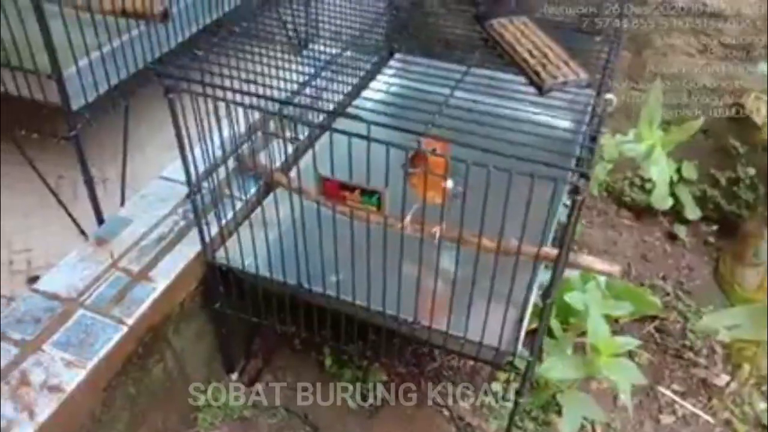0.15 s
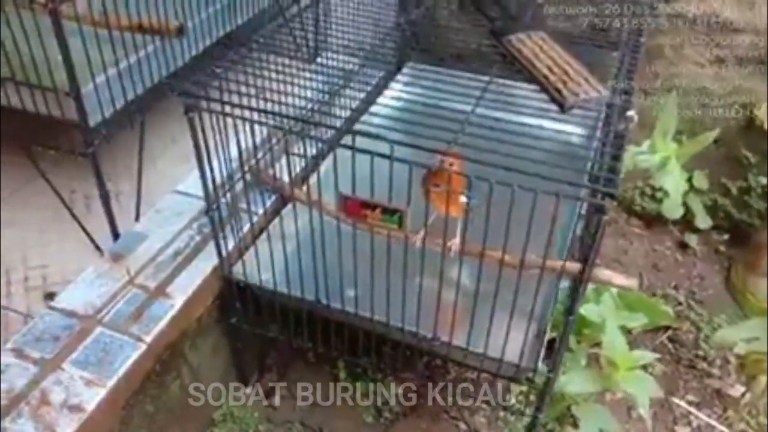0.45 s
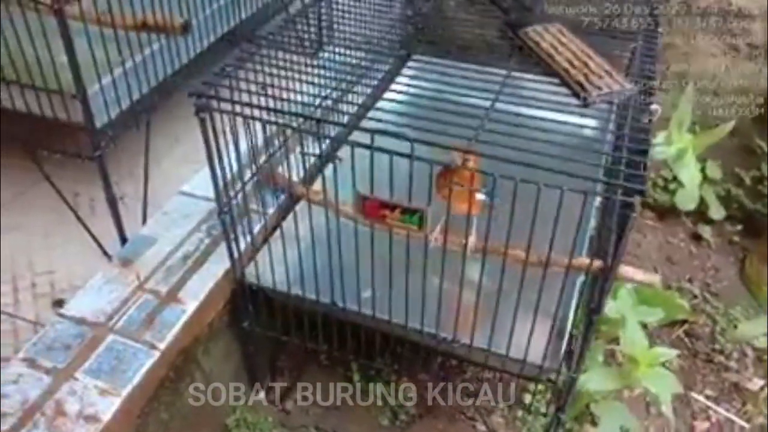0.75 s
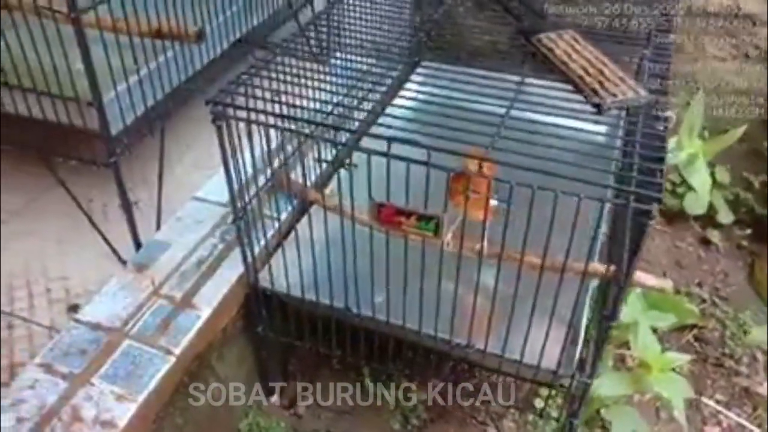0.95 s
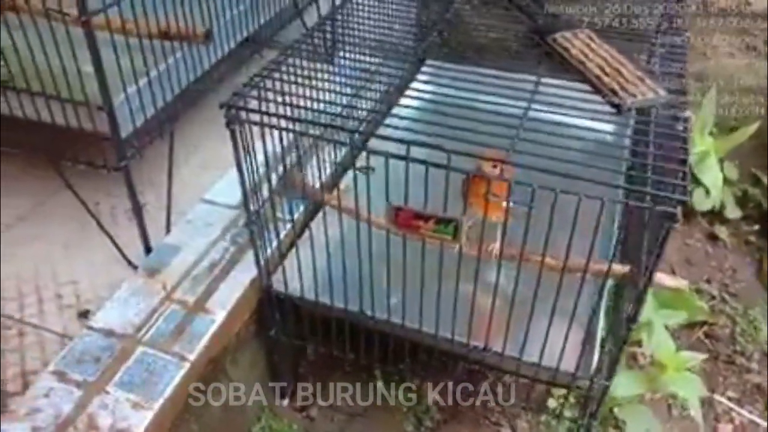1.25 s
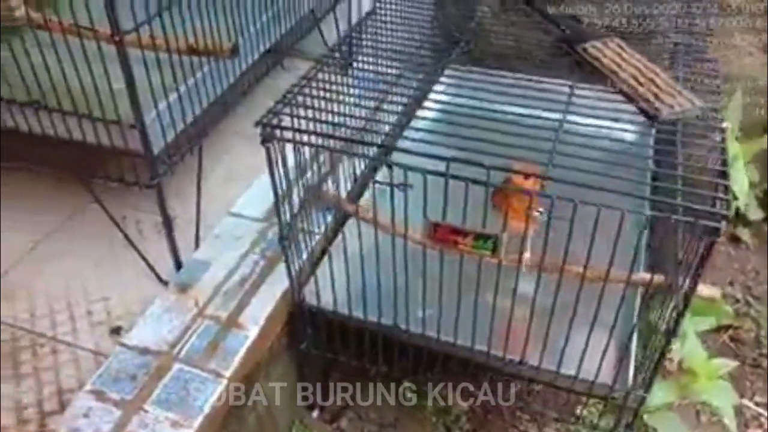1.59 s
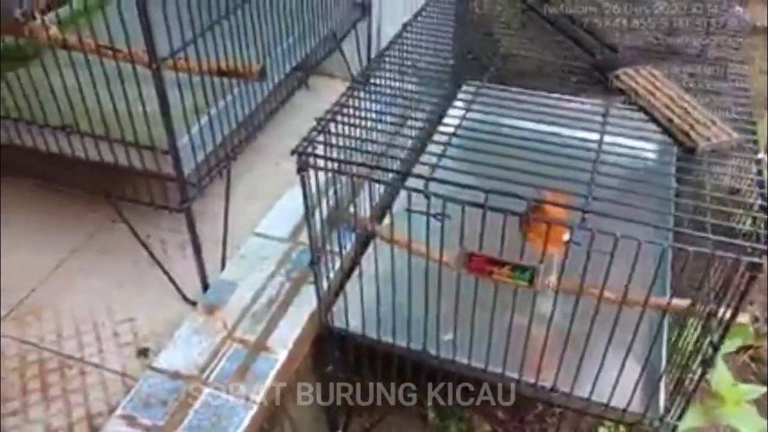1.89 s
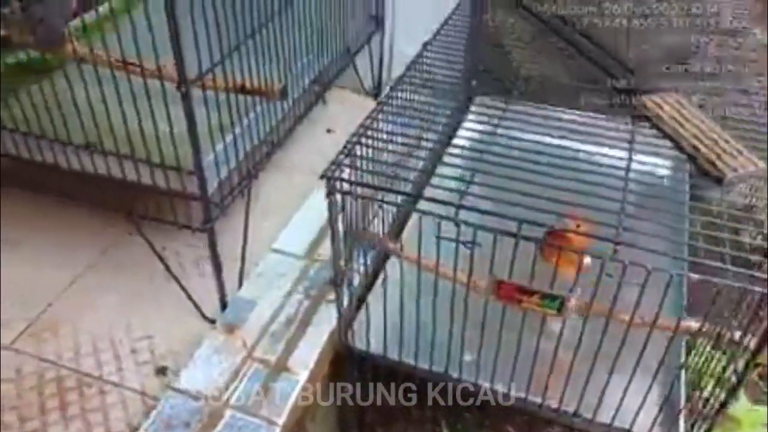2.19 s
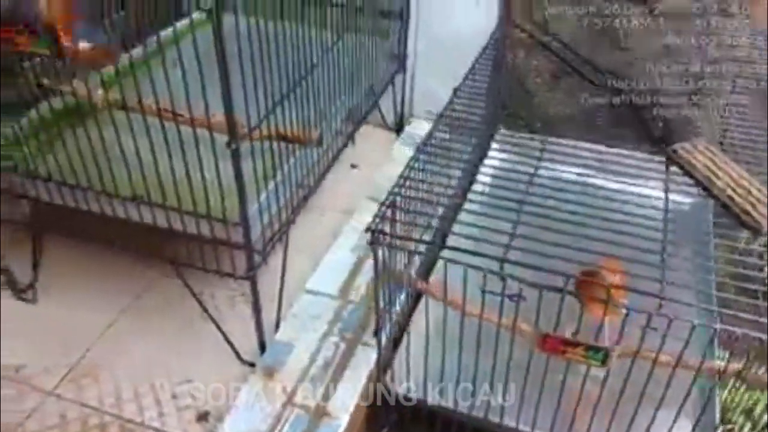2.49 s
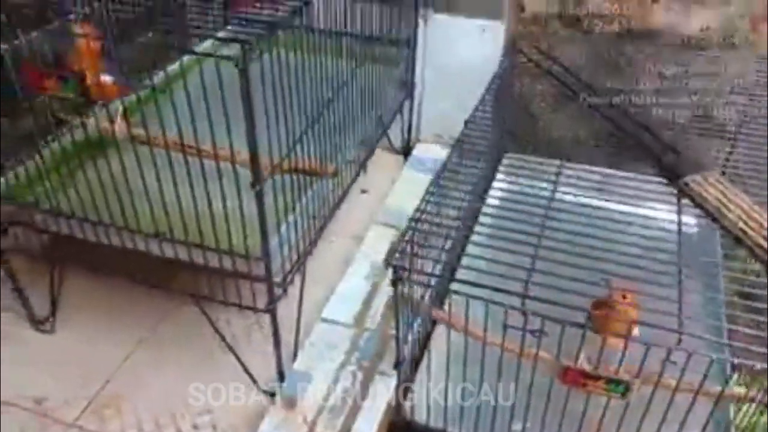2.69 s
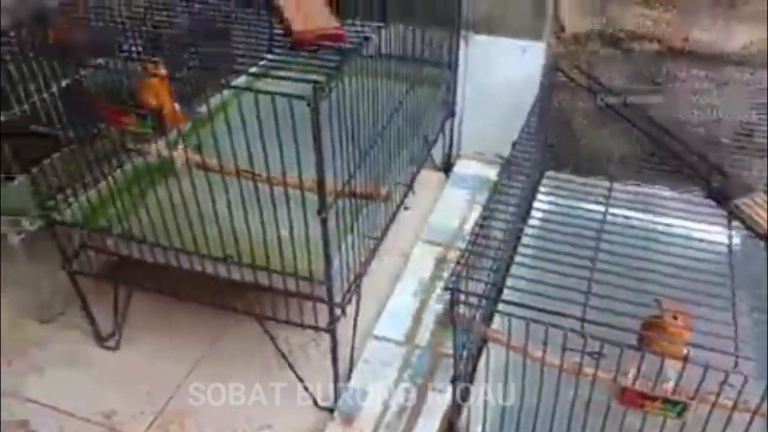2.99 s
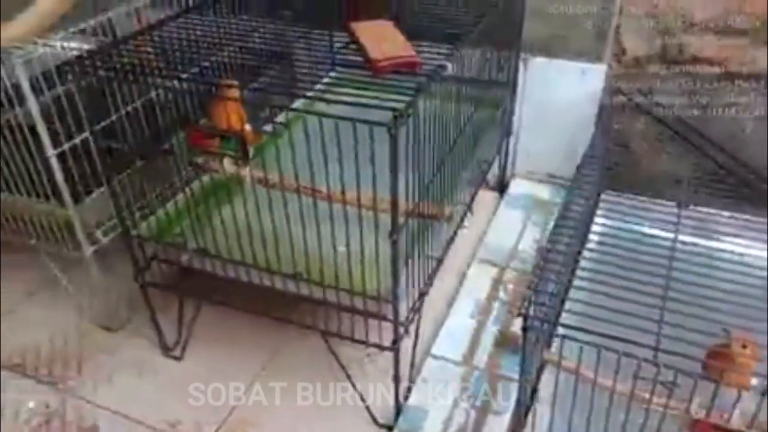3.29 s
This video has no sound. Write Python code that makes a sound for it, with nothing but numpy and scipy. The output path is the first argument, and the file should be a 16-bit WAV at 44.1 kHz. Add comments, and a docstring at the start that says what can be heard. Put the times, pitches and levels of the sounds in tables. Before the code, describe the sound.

Quick high bird chirps and a falling whistle, answered by farther wavering birds in an echoing yard.

```python
"""Caged birds in a tiled yard

A caged thrush close by sings hoarse two-voiced chirps and a falling whistle: paired sines, their
sum tones and sidebands, and rasping noise. Farther caged birds whistle as single wavering voices.
Shaped noise and unsteady drones make the distant traffic; sparse decaying echoes from the walls
smear every note."""
import sys
import numpy as np
from scipy import signal
from scipy.fft import rfft, irfft
from scipy.io import wavfile
from scipy.ndimage import uniform_filter1d

SR = 44100
rng = np.random.default_rng(int(sys.argv[2]) if len(sys.argv) > 2 else 0)


def master_out(mix):
    """Clip the mix to full scale and print it as 16-bit PCM to the path in sys.argv[1]."""
    frames = np.transpose(np.atleast_2d(mix))
    ceiling = np.clip(frames, -1, 1)
    pcm = np.round(ceiling * 32767).astype(np.int16)
    wavfile.write(sys.argv[1], SR, pcm)


def invert_db(level):
    """Linear amplitude ratio for a level in decibels (20 dB per decade), elementwise."""
    return 10 ** (np.asarray(level, dtype=float) / 20)


N = 152145  # samples

# Traffic and air spectrum, relative: frequency_hz, density_db (per Hz)
FLOOR_SPECTRUM = [(12, -36), (20, -10.5), (65, 1), (232, -9), (592, -18), (973, -30), (2050, -38.5),
                  (2770, -40), (4070, -47.5), (5830, -46), (7680, -52), (13300, -43), (14500, -66.5)]
# Left-right likeness of the background: frequency_hz, correlation (-1 to 1)
STEREO_LIKENESS = [(60, 0.97), (180, 0.95), (530, 0.82), (1580, 0.46), (4710, -0.14), (14000, -0.11)]
# The background sinks and returns: time_s, level_db
SWELL = [(0, 2.5), (.25, -0.5), (.5, -3.5), (1.1, -7.5), (1.45, -3.5), (1.85, 2), (2.4, 1.5), (2.7, 3),
         (3.45, 2.5)]
# How far each band follows the swell: frequency_hz, share (ratio)
SWELL_SHARE = [(40, 0.25), (120, 0.24), (300, 0.95), (1000, 1.02), (5000, 0.79)]
# Engine drones; width sets the rate of sway: pitch_hz, width_hz, level_db (before sway and swell)
DRONES = [(58, 4.7, -52), (101.5, 48, -59.5), (217, 9, -60), (252.8, 11.5, -64), (330.5, 6.7, -65.5)]
# Near bird, one table per note: time_s, main_hz, main_db, second_hz, second_db, rasp_db,
# overtone_db (over the main voice); levels before beak colour and shimmer
CHIRPS = [
    [(.152, 4190, -58, 2002, -50.5, -59.5, -35.5), (.168, 5025, -34, 2750, -46.5, -40.5, -16.5),
     (.2, 4548, -39, 2637, -45, -36, -5), (.23, 4230, -45.5, 2600, -83.5, -69.5, 4.5),
     (.258, 4327, -48, 2500, -58, -37, 1), (.28, 4610, -40.5, 2870, -52.5, -46.5, -8),
     (.3, 4980, -43.5, 3250, -46, -36.5, -8), (.335, 4680, -39, 3540, -47, -48.5, -16),
     (.352, 4680, -74, 3780, -88, -88, -13)],
    [(.394, 5100, -57.5, 3220, -63, -55.5, -24.5), (.406, 5330, -43, 3650, -60.5, -38.5, -14.5),
     (.424, 5077, -34.5, 3790, -47.5, -40, -14), (.446, 4830, -43.5, 3840, -61, -56.5, -6.5),
     (.472, 4460, -44, 3750, -78, -80, -5)],
    [(.534, 4810, -68, 2460, -54, -43.5, -17), (.545, 5400, -35, 3300, -53.5, -41.5, -13),
     (.558, 5445, -32.5, 4050, -60, -42, -6), (.58, 5500, -34, 4120, -52, -47, -17),
     (.59, 5490, -53, 4150, -80.5, -57, -22)],
    [(.61, 5210, -58, 3950, -57, -60.5, 16), (.62, 5490, -30.5, 4100, -74, -75, -9),
     (.633, 5190, -61, 4160, -60.5, -36, -9.5)],
    [(.661, 5106, -50, 3780, -68.5, -59, -3.5), (.67, 5170, -47, 3955, -53, -48, 4),
     (.686, 5400, -37.5, 3850, -63, -49.5, -5), (.72, 5290, -51, 3860, -75.5, -50.5, -0.5),
     (.762, 5290, -69, 3900, -91, -65, -17), (.775, 5330, -70, 3850, -85, -76.5, -9)],
    [(.885, 4394, -40, 2897, -33, -49, -13.5), (.893, 5070, -41, 3010, -66, -42.5, -12),
     (.901, 5794, -35, 4167, -47.5, -53, -6), (.918, 5820, -40, 4130, -72, -46.5, -14.5),
     (.96, 5656, -40.5, 4250, -120, -82.5, -5.5), (1.04, 5720, -42, 4100, -95, -105.5, -4.5),
     (1.07, 5573, -42, 4100, -90, -96.5, -5.5), (1.082, 5460, -73, 4100, -98, -70.5, 3)],
    [(1.32, 3700, -51, 5300, -61, -58, -18.5), (1.333, 3450, -54, 5000, -69.5, -50, -30),
     (1.35, 3250, -51.5, 4400, -58, -48, -54), (1.365, 3050, -47.5, 1500, -58, -64, -36),
     (1.385, 2890, -48, 1450, -84, -63, -44), (1.43, 2600, -46.5, 1330, -81, -69, -30.5),
     (1.48, 2507, -44.5, 1316, -78, -75.5, -34.5), (1.6, 2593, -48.5, 1310, -72, -68, -30.5),
     (1.66, 2612, -45.5, 1330, -72.5, -69, -32), (1.705, 2450, -50, 1310, -75, -66, -31),
     (1.72, 2360, -58, 1237, -69, -67, -28)],
]
# Per chirp: pan_db (left over right), jitter (share of pitch), sideband_db (over the rasp)
CHIRP_SETTINGS = [(1.5, .014, -1.5), (0.5, 0.014, -2), (-1, .008, -1), (2, 0.011, 3.5), (0, .01, -3),
                  (0.5, 0.0123, -3.5), (1.5, 0.0183, -10)]
# Farther birds, one table per whistle: time_s, pitch_hz, level_db (before beak, shimmer and distance)
WHISTLES = [
    [(.83, 2380, -71.5), (.9, 2494, -64.5), (.96, 2630, -78), (1.02, 2720, -73)],
    [(1.04, 2300, -69.5), (1.1, 2430, -67.5), (1.13, 2537, -64.5), (1.2, 2590, -83)],
    [(1.2, 2300, -69.5), (1.25, 2037, -71), (1.3, 2104, -61), (1.34, 1800, -59.5), (1.38, 1570, -71)],
    [(1.41, 2165, -58), (1.5, 2053, -66.5), (1.6, 1975, -58), (1.72, 2126, -60)],
    [(1.42, 1584, -74), (1.55, 1490, -77), (1.72, 1613, -67)],
    [(1.83, 2120, -61), (1.87, 2300, -68.5), (1.89, 2680, -63), (1.96, 2565, -68)],
    [(1.968, 3250, -63), (2.0, 3020, -64.5), (2.06, 3050, -59)],
    [(2.0, 2842, -56), (2.05, 2904, -57), (2.11, 2704, -55.5), (2.17, 2807, -52), (2.23, 2970, -54),
     (2.26, 2930, -69)],
    [(2.318, 3890, -63), (2.36, 3930, -57.5), (2.43, 3900, -75)],
    [(2.31, 5140, -78), (2.42, 4750, -74), (2.46, 4600, -72.5), (2.52, 4940, -76)],
    [(2.455, 3050, -60), (2.48, 3480, -67), (2.52, 3000, -60)],
    [(2.525, 2818, -50.5), (2.57, 2692, -63), (2.615, 2704, -53)],
    [(2.535, 5180, -66.5), (2.57, 5810, -66.5), (2.61, 6430, -81), (2.67, 5640, -72)],
    [(2.63, 2739, -51.5), (2.66, 2863, -52.5), (2.7, 2790, -77)],
    [(2.885, 2170, -71.5), (2.95, 2075, -62), (2.99, 1970, -57.5)],
    [(3.01, 2320, -59), (3.04, 2450, -61.5), (3.075, 2850, -55), (3.1, 3020, -56), (3.125, 3200, -67)],
    [(3.235, 2240, -60), (3.265, 2230, -59), (3.29, 2007, -65.5), (3.33, 1954, -64.5), (3.4, 1970, -75)],
]
# Per whistle: pan_db (left over right), jitter (share of pitch), overtone_db, breath_db (over the voice)
WHISTLE_SETTINGS = [(-2, .008, -34, -26), (-1.5, 0.025, -50, -30), (1.5, 0.019, -38, -15),
                    (0, 0.038, -35, -44), (-3.5, 0.0586, -28, -37), (1.5, 0.026, -24.5, -16),
                    (4, 0.062, -33, -17.5), (-1, 0.01, -35, -28), (-2, 0.021, -20, -15), (1, 0.083, -26, 3),
                    (3, 0.063, -40, -19), (3.5, 0.019, -29, -17), (0, .07, -22, -11),
                    (0.5, 0.011, -37, -14), (-1.5, 0.014, -42, -28), (1, 0.034, -25, -23),
                    (-0.5, 0.017, -35.5, -29)]
# Harmonics of a voice: multiple (ratio), level_db (added to the note's overtone level)
OVERTONES = [(2, -6), (3, -7), (4, 2.5), (5, -3)]
# Colour of the open beak and the microphone: frequency_hz, gain_db
BEAK = [(1000, 10.5), (1900, -2), (2700, 1), (5000, -1.5), (6500, -1), (7600, -4.5), (8800, 2.5),
        (11000, 2.5), (13000, 14), (14500, -1)]
# Relative spectrum of the rasping air and weight of the sidebands: frequency_hz, gain_db
RASP_SPECTRUM = [(1200, -27.5), (1900, -30.5), (3000, -8), (4000, -7.5), (5200, -3.5), (7300, -13.5),
                 (8500, -9.5), (10000, -6.5), (12500, -5), (14500, -3)]
# Sideband places around the main voice, negative steps on the second voice's side:
# step (multiples of the gap between the voices)
SIDEBAND_STEPS = [-3, -2, 1, 2, 3, 4, 5, 6, 7]
# Time for the yard's echoes to die by 60 dB: frequency_hz, t60_s
YARD_T60 = [(1500, 0.49), (3000, .6), (5500, 0.39), (9000, 0.43), (13000, 0.27)]

FLOOR_DB, AIR_TOP_HZ = -43.5, 13730  # level before overlap scaling; spectrum is flat above the top
EDGE_S = .008  # fade at each end of a note
JITTER_S, SHIMMER_DB = .0015, 2
SUM_DB, LOW_DOUBLE_DB = 33, -2  # sum tones; octave of the second voice
GAP_TONE_DB, GAP_LOW_HZ = -20, 1697  # the gap itself sounds when it is high enough
NEAR_WET_DB, FAR_WET_DB, FAR_DRY_DB = 2, 4.5, -2
FIRST_ECHO_S, SHARED_ECHO = .001, 0.073  # earliest echo; share of echo power common to both sides
CAGE_DB, CAGE_T60_S = 2, .09  # quick echoes from the tray and the nearest wall


def evened(x):
    """Normalization: scales a signal to unit rms."""
    return x / np.sqrt(np.mean(x ** 2) + 1e-20)


def read(points, hz):
    """Spectral interpolation: reads a curve along a logarithmic frequency axis."""
    f, value = np.transpose(points)
    return np.interp(np.log(hz + 1), np.log(f + 1), value)


def wobble(n, seconds):
    """Low-pass random modulation: noise averaged twice wanders smoothly at unit rms."""
    size = max(int(seconds * SR), 2)
    smooth = uniform_filter1d(rng.standard_normal(n), size)
    return evened(uniform_filter1d(smooth, size))


def background():
    """Partly coherent noise: traffic rumble and air hiss, with narrow-band engine drones wavering."""
    frames, hz = N // 512 + 5, np.fft.rfftfreq(2048, 1 / SR)
    a, b, c, d, patches = rng.standard_normal((frames, 1025, 5)).T
    patches = uniform_filter1d(patches, 10, 0)
    patches = evened(uniform_filter1d(patches, 10, 1))

    # the right side blends the left's noise with its own
    same = read(STEREO_LIKENESS, hz)[:, None]
    left = a + 1j * b
    right = same * left + np.sqrt(1 - same ** 2) * (c + 1j * d)
    z = np.array([left, right])
    z *= invert_db(read(FLOOR_SPECTRUM, np.minimum(hz, AIR_TOP_HZ))[:, None] + 1.5 * patches)
    z /= np.sqrt(np.mean(abs(z) ** 2))
    swell_db = np.interp(np.arange(frames) * 512 / SR, *np.transpose(SWELL))
    z *= invert_db(read(SWELL_SHARE, hz)[:, None] * swell_db)
    noise = signal.istft(z, nperseg=2048, noverlap=1536)[1][:, :N]
    out = invert_db(FLOOR_DB) * 1.23 * np.sqrt(3) / 64 * noise

    t = np.arange(N) / SR
    swell_db = np.interp(t, *np.transpose(SWELL))
    for pitch_hz, width_hz, level_db in DRONES:
        # a wandering complex envelope sways both level and phase
        sway = wobble(N, 0.86 / width_hz) + 1j * wobble(N, 0.58 / width_hz)
        tone = ((1 + sway / 2) * np.exp(2j * np.pi * pitch_hz * t)).real
        out += invert_db(level_db + read(SWELL_SHARE, pitch_hz) * swell_db) * tone
    return out


def controls(rows):
    """Piecewise-linear control: note columns at every sample, with a gate that fades at both ends."""
    rows = np.array(rows)
    t = np.arange(rows[0, 0], rows[-1, 0], 1 / SR)
    gate = np.clip(np.minimum(t - t[0], t[-1] - t) / EDGE_S, 0, 1)
    return gate, [np.interp(t, rows[:, 0], column) for column in rows.T[1:]]


def jittered_phase(hz, jitter):
    """Frequency modulation: phase is the running integral of an unsteady pitch."""
    return 2 * np.pi * np.cumsum(hz * (1 + jitter * wobble(len(hz), JITTER_S))) / SR


def partial(phase, hz, db):
    """Source and filter: one sine coloured by the beak, silent above the top of the band."""
    return np.sqrt(2) * invert_db(db + read(BEAK, hz)) * (hz < .45 * SR) * np.sin(phase)


def stack(phase, hz, db, overtone_db):
    """Harmonic series: a voice with phase-locked overtones at whole multiples."""
    voice = partial(phase, hz, db)
    for multiple, level_db in OVERTONES:
        k = round(multiple)
        voice = voice + partial(k * phase, k * hz, db + overtone_db + level_db)
    return voice


def chirp(rows, jitter, sideband_db, rasp):
    """Intermodulation: the two sides of the syrinx mix into sum tones and sidebands as air rasps through."""
    gate, (main, main_db, second, second_db, rasp_db, overtone_db) = controls(rows)
    n = len(gate)
    a, b = jittered_phase(main, jitter), jittered_phase(second, jitter)
    main_db = main_db + SHIMMER_DB * wobble(n, .004)
    sum_db = main_db + second_db + SUM_DB  # a product of the two amplitudes
    tones = stack(a, main, main_db, overtone_db)
    tones += partial(b, second, second_db)
    tones += partial(2 * b, 2 * second, second_db + LOW_DOUBLE_DB)
    tones += partial(a + b, main + second, sum_db)
    tones += partial(2 * a + b, 2 * main + second, sum_db + overtone_db / 2)

    gap = main - second
    comb = np.zeros(n)
    for k in SIDEBAND_STEPS:
        hz = abs(main + k * gap)
        level_db = sideband_db + read(RASP_SPECTRUM, hz) + SHIMMER_DB * wobble(n, 0.0068)
        comb += invert_db(level_db) * (hz < .45 * SR) * np.sin(a + k * (a - b))
    comb += invert_db(sideband_db + GAP_TONE_DB) * (gap > GAP_LOW_HZ) * np.sin(a - b)

    start = round(rows[0][0] * SR)
    hoarse_gain = invert_db(rasp_db + SHIMMER_DB * wobble(n, 0.0014))
    return gate * (tones + hoarse_gain * (comb + rasp[start:start + n]))


def yard(x):
    """Diffuse reverberation: sparse echoes of random sign, each band dying at its own speed."""
    # one echo at a random place in every 20 samples: left, right and shared
    taps = np.zeros((3, SR))
    at = np.arange(0, SR - 20, 20) + rng.integers(0, 20, (3, (SR - 1) // 20))
    np.put_along_axis(taps, at, rng.choice([-1., 1.], at.shape), 1)
    taps[:, :round(FIRST_ECHO_S * SR)] = 0
    taps = np.sqrt(SHARED_ECHO) * taps[2] + np.sqrt(1 - SHARED_ECHO) * taps[:2]

    hz, t, z = signal.stft(taps, SR, nperseg=256)
    t60 = read(YARD_T60, hz)[:, None]
    decay = invert_db(-60 * t / t60) + invert_db(CAGE_DB - 60 * t / CAGE_T60_S)
    tail = signal.istft(z * decay / np.sqrt(t60), SR, nperseg=256)[1]
    return signal.fftconvolve(x, tail / np.linalg.norm(tail[0]), axes=1)[:, :N]


def whistle(rows, jitter, overtone_db, breath_db, rasp):
    """Jittered oscillation: one voice turns from pure to burry as jitter grows, with breath noise."""
    gate, (hz, db) = controls(rows)
    n, start = len(gate), round(rows[0][0] * SR)
    phase = jittered_phase(hz, jitter)
    voice = stack(phase, hz, db + SHIMMER_DB * wobble(n, 0.0059), overtone_db)
    return gate * (voice + invert_db(db + breath_db) * rasp[start:start + n])


def place(mix, start_s, sound, pan_db):
    """Interaural level difference: adds a note with its level split between left and right."""
    for side, gain_db in zip(mix, (pan_db / 2, -pan_db / 2)):
        part = side[round(start_s * SR):][:len(sound)]
        part += sound[:len(part)] * invert_db(gain_db)


def scene():
    """Superposition: near and far birds, their echoes in the yard, and the traffic."""
    near, far = np.zeros((2, N)), np.zeros((2, N))
    # one stretch of shaped noise serves as rasp and breath for all birds
    spectrum = rfft(rng.standard_normal(N))
    rasp = evened(irfft(spectrum * invert_db(read(RASP_SPECTRUM, np.fft.rfftfreq(N, 1 / SR))), N))
    for rows, (pan_db, *voice) in zip(CHIRPS, CHIRP_SETTINGS):
        place(near, rows[0][0], chirp(rows, *voice, rasp), pan_db)
    for rows, (pan_db, *voice) in zip(WHISTLES, WHISTLE_SETTINGS):
        place(far, rows[0][0], whistle(rows, *voice, rasp), pan_db)
    direct = near + far * invert_db(FAR_DRY_DB)
    echoes = yard(near * invert_db(NEAR_WET_DB) + far * invert_db(FAR_WET_DB))
    return direct + echoes + background()


def band_limit(x):
    """A steep low-pass at the top of the band."""
    return signal.sosfilt(signal.butter(12, 14620, fs=SR, output="sos"), x)


def record(dry):
    """Band limitation: a linear-phase low-pass removes the top above 14250 Hz."""
    low_pass = signal.firwin(401, 14250, window=("kaiser", 9), fs=SR)
    mix = signal.oaconvolve(dry, low_pass[None], "same")
    return band_limit(mix)


dry = scene()
out = record(dry)
master_out(out)
```